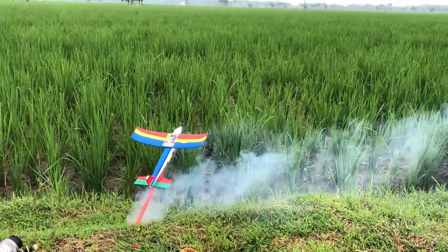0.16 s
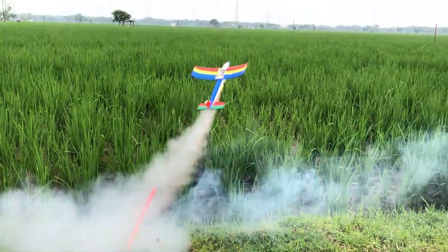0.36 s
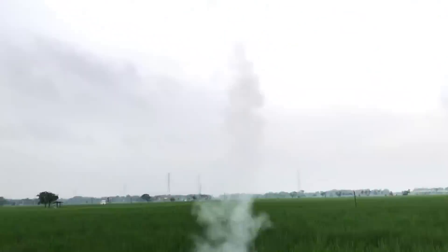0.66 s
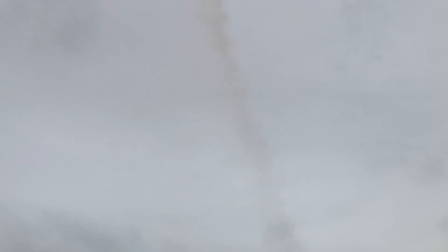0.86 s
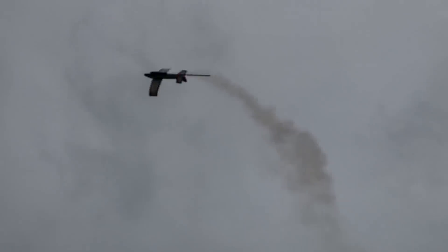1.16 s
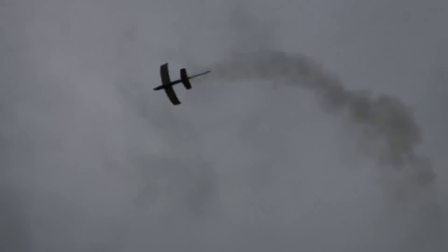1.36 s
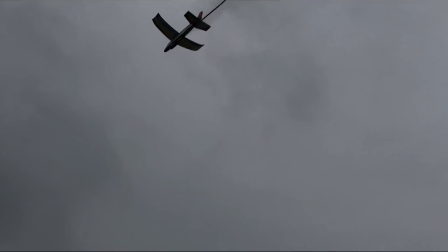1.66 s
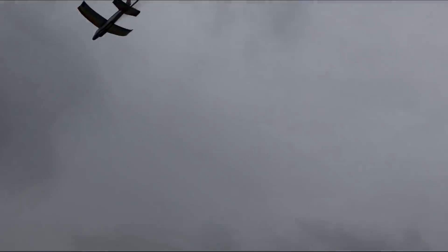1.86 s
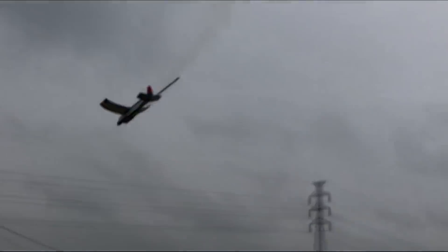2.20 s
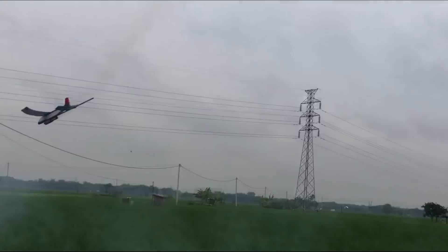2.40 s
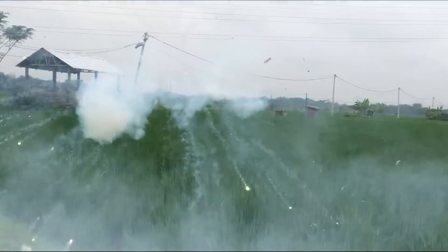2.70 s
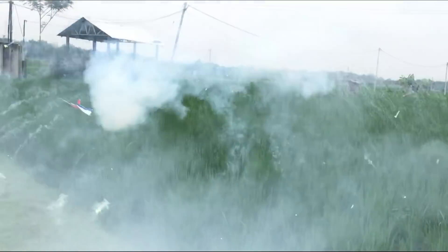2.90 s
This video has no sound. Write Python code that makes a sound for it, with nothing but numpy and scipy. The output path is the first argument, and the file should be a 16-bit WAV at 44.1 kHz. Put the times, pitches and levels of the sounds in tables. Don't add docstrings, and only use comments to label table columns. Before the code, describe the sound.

A small firework rocket plane roars off a grass bank, hisses overhead, and bursts with a bang

```python
import sys
import numpy as np
from scipy import signal
from scipy.fft import rfft, irfft, next_fast_len
from scipy.io import wavfile
from scipy.ndimage import uniform_filter1d, map_coordinates

SR = 44100
rng = np.random.default_rng(int(sys.argv[2]) if len(sys.argv) > 2 else 0)


def voltage_ratio(decibels):
    exponent = np.asarray(decibels, float) / 20
    return 10 ** exponent


def generate_wav(sig):
    pcm = np.round(np.clip(np.atleast_2d(sig).T, -1, 1) * 32767).astype(np.int16)
    wavfile.write(sys.argv[1], SR, pcm)


N = 134505
TIME = np.arange(N) / SR


def unit(x):
    return x / np.sqrt(np.mean(x ** 2) + 1e-20)


def along(points, hz):
    f, v = np.transpose(points)
    return np.interp(np.log(hz + 1), np.log(f + 1), v)


def curves(rows, t=TIME):
    s, *cols = np.transpose(rows)
    return [np.interp(t, s, c) for c in cols]


def wobble(rate):
    knots = rng.standard_normal(int(N * rate / SR) + 4)
    return map_coordinates(knots, [TIME * rate])


def filtered(x, response):
    m = next_fast_len(N + SR // 2)
    return irfft(rfft(x, m) * response(np.fft.rfftfreq(m, 1 / SR)), m)[..., :N]


def resonance(f, centre, width):
    return 1j * f * width / (centre ** 2 - f * f + 1j * f * width)


def hiss(spectrum):
    return unit(filtered(rng.standard_normal(N), lambda hz: voltage_ratio(along(spectrum, hz))))


def turbulence(colour_db, patchy_db, size=256):
    hz, t, z = signal.stft(rng.standard_normal(N), SR, nperseg=size)
    gain = voltage_ratio(colour_db(hz[:, None], t))
    gain = gain / np.sqrt(np.mean(gain ** 2, axis=0))
    patches = uniform_filter1d(rng.standard_normal(z.shape), size=5, axis=0)
    patches = unit(uniform_filter1d(patches, size=6, axis=1))
    return signal.istft(z * gain * voltage_ratio(patchy_db * patches), SR, nperseg=size)[1][:N]


def swell(peak_s, rise_s, t60):
    after = np.clip(TIME - peak_s, 0, 1)
    rise = np.clip(1 + (TIME - peak_s) / max(rise_s, 4e-4), 0, 1)
    return rise * np.exp(-np.log(1000) * after / max(t60, 5e-3))


def swells(rows):
    return np.sqrt(sum((voltage_ratio(db) * swell(s, rise, t60)) ** 2 for s, db, rise, t60 in rows))


def air():
    # peak time in seconds, level in dB, rise in seconds, decay time t60 in seconds
    gusts = [(.05, -44, 0.061, 1.1), (.28, -40, 0.12, 0.37), (.59, -35.5, 0.084, 0.67),
             (.762, -37.5, 0.025, 0.25), (.8, -45, 0.033, 0.29), (.9, -47, .03, .4),
             (.958, -33.5, 0.02, 0.22), (1.0, -42.5, 0.035, .4), (1.065, -38.5, 0.044, .3),
             (1.1, -40, 0.015, .6), (1.17, -36, 0.049, 0.36), (1.23, -44, .03, .15), (1.29, -52, 0.02, .2),
             (1.33, -53, .02, .2), (1.755, -45, 0.02, 0.35), (1.83, -50, .03, 0.43), (2.45, -47, 0.35, 1.2),
             (2.95, -52, 0.01, 0.17)]
    # frequency in Hz, level in dB per Hz
    buffet = [(12, -53), (20, -30), (64, 1.5), (198, 3), (458, -18.5), (499, -33), (600, -38), (780, -60),
              (1320, -120)]
    # frequency in Hz, level in dB per Hz
    field = [(60, -60), (150, -20), (500, -2), (800, -18), (3000, -16), (15800, -17.5)]
    breeze_db, field_db = -51, -54.5
    eddy_hz, eddy_full_db, eddy_grows = 135, -36.5, 0.72
    steady_s = 0.03

    eddies = hiss(buffet)
    power = np.abs(uniform_filter1d(eddies ** 2, size=int(steady_s * SR)))
    eddies = eddies / np.sqrt(power + 0.18)
    lumps = unit(voltage_ratio(2.3 * wobble(40)) * eddies)
    large = filtered(lumps, lambda f: 1 / (1 + (f / eddy_hz) ** 4))
    gust = np.hypot(swells(gusts), voltage_ratio(breeze_db))
    small = np.clip(gust / voltage_ratio(eddy_full_db), 0, 1) ** eddy_grows * (lumps - large)
    return gust * (large + small) + voltage_ratio(field_db) * hiss(field)


def answers():
    # peak time in seconds, level in dB, rise in seconds, decay time t60 in seconds
    echoes = [(2.611, -14.5, 0.008, 0.069), (2.643, -31, 0.0044, 0.036), (2.668, -20.5, 0.014, 0.11),
              (2.687, -23, 0.008, 0.06), (2.702, -21, 0.012, 0.19), (2.736, -25.5, .01, 0.11),
              (2.765, -18, 0.019, 0.036), (2.809, -31, 0.047, 0.23), (2.848, -34, 0.0013, 0.034),
              (2.95, -43, .01, 0.33), (3.05, -41.5, 0.013, .1)]
    # frequency in Hz, level in dB per Hz
    near = [(60, -53), (150, -25), (400, -9), (900, -0.5), (1500, -1), (2000, -11), (5000, -17),
            (15800, -34)]
    # frequency in Hz, level in dB per Hz
    late = [(59, -50), (100, -24), (140, 1), (214, 0), (356, 2), (1120, -14.5), (1820, -15), (2160, -20.5),
            (15800, -43.5)]
    dull_from_s, dull_by_s = 2.56, 2.964
    tail = (2.63, -29, 0.015, 1)

    def colour_db(hz, t):
        far = np.clip((t - dull_from_s) / (dull_by_s - dull_from_s), 0, 1)
        return (1 - far) * along(near, hz) + far * along(late, hz)

    level = swells(echoes + [tail]) * voltage_ratio(1.4 * wobble(150))
    return level * turbulence(colour_db, patchy_db=1.5, size=512)


def debris():
    # peak time in seconds, frequency in Hz, level in dB, rise and t60 in seconds
    flares = [(2.586, 295, -10.5, 0.0072, .05), (2.595, 250, -10.5, 0.0062, 0.038),
              (2.602, 410, -8, .004, .014), (2.583, 1760, -9.5, 0.0043, 0.052),
              (2.594, 1870, -9.5, .007, 0.019), (2.594, 3060, -15.5, 0.015, 0.02),
              (2.59, 1300, -15.5, .006, 0.033), (2.6, 780, -10, 0.0029, 0.036),
              (2.602, 1400, -16, 0.0045, 0.015), (2.597, 2590, -13.5, .004, 0.037),
              (2.616, 1010, -18.5, .006, 0.032), (2.644, 790, -21, .004, .025),
              (2.588, 600, -17, .008, .06), (2.622, 720, -19, 0.0045, .03), (2.701, 950, -18, .008, .05),
              (2.761, 1400, -19, .008, .03), (2.765, 400, -22, .01, .05), (2.95, 200, -37, .008, .1),
              (2.63, 110, -31.5, 0.028, 0.05)]
    # time in seconds, peak level in dB
    ticks = [
        (2.656, -17),
        (2.6745, -19),
        (2.703, -11),
        (2.7615, -31),
        (2.769, -27),
        (2.798, -34),
        (2.818, -32),
    ]
    # peak time in seconds, level in dB, rise in seconds, decay time t60 in seconds
    sparks = [
        (2.61, -30, .01, 0.31),
        (2.66, -32.5, .005, 0.35),
        (2.705, -32.5, 0.024, 0.39),
    ]
    # frequency in Hz, level in dB per Hz
    fizz = [(1500, -25), (2600, -3), (3500, 0), (8000, -2.5), (15800, -3.5)]
    tick_t60 = 0.008

    drift = 0.48 * wobble(200)
    ringing = 0
    for s, hz, db, rise, t60 in flares:
        ringing = ringing + voltage_ratio(db) * swell(s, rise, t60) * np.sin(2 * np.pi * hz * TIME + drift)
    ticking = swells([(s, db - 6, 0.0004, tick_t60) for s, db in ticks])
    return ringing + np.hypot(ticking, swells(sparks)) * hiss(fizz)


def burst():
    # frequency in Hz, width in Hz, level in dB
    casing = [(273, 60, -4), (427, 56, -3), (710, 250, -5.5), (1230, 250, -4), (1790, 160, 3.5),
              (3090, 110, -4.5)]
    start_s, rise_s, hold_s, t60, blast_db = 2.574, 0.014, 0.0159, 0.022, -9.5
    crack_s, crack_db, crack_t60 = 2.597, -13, 0.04

    def ring(f):
        return sum((-1) ** k * voltage_ratio(db) * resonance(f, c, w) for k, (c, w, db) in enumerate(casing))

    full = start_s + rise_s
    held = swell(full + hold_s, 12.0 * hold_s, t60) * (TIME > full)
    shape = np.maximum(swell(full, rise_s, t60), held)
    gas = filtered(rng.standard_normal(N), ring)
    high = filtered(gas, lambda f: 1 / (1 + (1000 / (f + 1)) ** 6))
    gas = gas - high * np.clip((TIME - crack_s) / 0.003, 0, 0.8)
    blast = voltage_ratio(blast_db) * shape * unit(gas)
    crack_colour = [(800, -42), (3000, 7.0), (7000, 4), (15800, 0.5)]  # (Hz, dB per Hz)
    crack = voltage_ratio(crack_db) * swell(crack_s, 0.0014, crack_t60) * hiss(crack_colour)
    return blast + crack


def pulses():
    # time in seconds, peak level in dB
    knocks = [
        (1.369, -32),
        (2.138, -35),
        (2.154, -27.5),
        (2.274, -23.5),
        (2.848, -24.5),
    ]
    spit_hz, spit_s = 1030, 0.0022

    total = 0
    for s, db in knocks:
        v = (TIME - s) / spit_s
        total = total + voltage_ratio(db) * np.exp(-v ** 2) * np.sin(2 * np.pi * spit_hz * spit_s * v * (1 - 0.26 * v))
    return total


def flight():
    # time in seconds, jet level in dB, air loss at the top in dB, extra rumble in dB
    path = [(.66, -29, 2, 8), (.74, -38.5, 4.5, 3.5), (.85, -41.5, 7, -0.5), (1, -40, 3.5, 1),
            (1.18, -33, 1, -0.5), (1.35, -29, -2, 2.5), (1.6, -27, -1, 3), (1.8, -24, -2, 4),
            (2.3, -20.5, -1.5, 0.5), (2.56, -18.5, -2.5, -6.5), (2.6, -24.5, 2.5, -18),
            (2.635, -39, -11, 5), (2.66, -63, -2, 0)]
    # frequency in Hz, level in dB per Hz
    jet_colour = [(88, -39), (150, -22.5), (421, -7.5), (532, -13), (901, -6), (2900, -5.5), (5630, 0),
                  (11600, -4), (15800, -2)]
    # time in seconds, lower band in Hz, depth in dB
    shadow = [(.7, 13000, 0), (.85, 11800, 7), (.98, 10600, 6), (1.1, 8800, 7), (1.3, 8000, 6),
              (1.55, 7700, 3), (2.05, 7600, 3), (2.4, 7200, 1)]
    shadow_width, shadow_ratio = 0.085, 1.52
    air_hz, rumble_hz = 11300, 2930

    def colour_db(hz, t):
        _, loss_db, rumble_db = curves(path, t)
        shadow_hz, shadow_db = curves(shadow, t)
        dips = sum(np.exp(-(np.log((hz + 1) / (k * shadow_hz)) / shadow_width) ** 2 / 2)
                   for k in (1, shadow_ratio))
        absorbed = loss_db * 2 / (1 + (air_hz / (hz + 1)) ** 4)
        rumble = rumble_db / (1 + (hz / rumble_hz) ** 4)
        return along(jet_colour, hz) - shadow_db * dips - absorbed + rumble

    jet = turbulence(colour_db, patchy_db=0.23)
    level = voltage_ratio(curves(path)[0] + 0.54 * wobble(30.03) + 0.58 * wobble(400))
    return level * (TIME > 0.6) * (TIME < 2.7) * jet


def lift_off():
    # time in seconds, thrust in dB, turned away 0 to 1, ground path longer by ms
    thrust = [
        (0, -37.5, 0.05, 0.61),
        (.1, -36, 0, 0.56),
        (.26, -21.5, 0, 0.63),
        (.294, -8, 0.2, 0.6),
        (.315, -12, 0, 0.48),
        (.42, -12.5, 0.27, 0.83),
        (.53, -12, 0.68, 1.22),
        (.65, -12, 1, 2.18),
        (.7, -33.5, 0.2, 4.3),
    ]
    # frequency in Hz, level in dB per Hz
    facing = [(88, -50), (150, -21), (786, -11.5), (1500, -11), (2120, -5.5), (2840, -9), (3260, -8.5),
              (8470, -9.5), (14600, 1.5), (15800, -3.5)]
    # frequency in Hz, level in dB per Hz
    behind = [(88, -49), (150, -14.5), (483, -7.5), (660, -6.5), (1250, -1.5), (2840, -7), (3140, -7),
              (5740, -5.5), (15800, -9)]
    # frequency in Hz, level in dB per Hz
    smoulder = [(180, -28), (300, -15), (900, -6), (1600, -14), (2500, -5.5), (5300, -9.5), (9600, -15.5),
                (15800, -12)]
    # frequency in Hz, width in Hz, level in dB
    tube_modes = [(760, 120, -7), (2000, 200, 3), (2400, 170, 10), (2800, 300, -10), (4640, 200, 8),
                  (6850, 350, 4)]
    # time in seconds, change in dB, width in seconds
    surges = [
        (.337, 2, 0.0055),
        (0.373, 3, 0.015),
        (.44, 0.5, 0.017),
        (.475, 0.5, 0.01),
        (.528, -3, .01),
        (0.545, 3.5, 0.0079),
        (.578, 2, 0.0063),
        (.61, 1, 0.014),
        (.645, -1.5, 0.011),
    ]
    fade_db_per_s, sputter_db = 296, 0.6
    catch_s, catch_width_s = 0.27, 0.033
    nozzle_hz, nozzle_sag_hz_per_s, nozzle_width_hz, nozzle_db = 2350, 3300, 170, 5
    mirror, scatter_hz_ms = 0.72, 2500

    def colour_db(hz, t):
        _, away, ms = curves(thrust, t)
        lit = 1 / (1 + np.exp((catch_s - t) / catch_width_s))
        tube = sum(db / (1 + ((hz - c) / w) ** 2) for c, w, db in tube_modes)
        tube = tube * (1 - 0.5 * lit) * (1 - away)
        note_hz = nozzle_hz - nozzle_sag_hz_per_s * (t - 0.3)
        nozzle = lit * nozzle_db / (1 + ((hz - note_hz) / nozzle_width_hz) ** 2)
        share = 0.34 * (1 - lit) + lit * mirror / (1 + (hz * ms / scatter_hz_ms) ** 4)
        ground = 10 * np.log10(1 + share ** 2 + 2 * share * np.cos(2 * np.pi * hz * ms / 1000))
        jet = (1 - away) * along(facing, hz) + away * along(behind, hz)
        return lit * jet + (1 - lit) * along(smoulder, hz) + tube + nozzle + ground

    db = curves(thrust)[0] - fade_db_per_s * np.clip(TIME - thrust[-1][0], 0, 1)
    uneven = sum(change * np.exp(-((TIME - s) / w) ** 2) for s, change, w in surges)
    db = db + sputter_db * wobble(44.7) + 0.85 * wobble(250) + uneven
    return voltage_ratio(db) * turbulence(colour_db, patchy_db=0.54, size=512)


def scene():
    mono = air() + answers() + debris() + burst() + pulses() + flight() + lift_off()
    return np.array([mono, mono])


def diffuse_patches(x):
    # time in seconds, low edge in Hz, high edge in Hz
    fills = [(.7854, 5100, 6350), (.7854, 7500, 9700), (.7854, 12250, 15250), (1.0414, 5000, 7650),
             (1.0414, 12950, 14550), (1.1342, 5500, 7550), (1.2271, 4100, 5200), (1.2271, 6850, 8300),
             (1.2271, 8800, 10400), (1.2271, 10950, 12400), (2.0166, 4500, 6950), (2.0166, 9500, 11100),
             (2.0862, 6750, 8200), (2.1327, 7450, 9700), (2.3881, 12950, 14550), (2.5274, 11550, 13150)]
    side_db, frame_s = -1, 1024 / SR

    hz, t, z = signal.stft(x, SR, nperseg=512)
    filled = sum(np.outer((hz > lo) & (hz < hi), np.abs(t - s) < 0.45 * frame_s) for s, lo, hi in fills)
    random_phase = np.exp(2j * np.pi * rng.random(z.shape))
    return voltage_ratio(side_db) * signal.istft(z * filled * random_phase, SR, nperseg=512)[1][:N]


def low_pass(x):
    return signal.sosfilt(signal.butter(12, 16300, fs=SR, output="sos"), x)


def record(dry):
    port_hz, port_width_hz, port_dip = 2716, 650, 0.39
    ceiling, top_hz = 1, 15830

    x = filtered(dry, lambda f: 1 - port_dip * resonance(f, port_hz, port_width_hz))
    x = x / (1 + np.abs(x / ceiling) ** 4) ** (1 / 4)
    x = filtered(x, lambda f: f < top_hz)
    side = diffuse_patches(x[0])
    return low_pass(x + [side, -side])


dry = scene()
out = record(dry)
generate_wav(out)
```